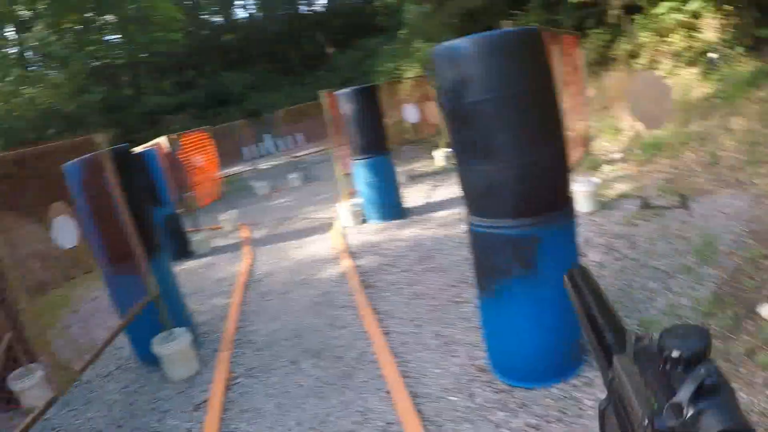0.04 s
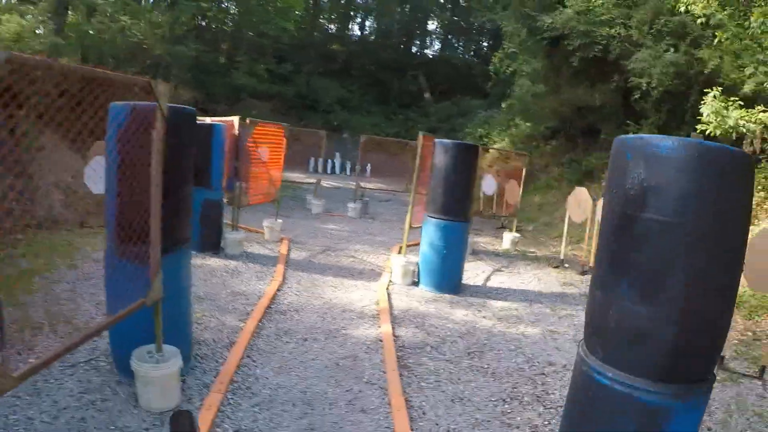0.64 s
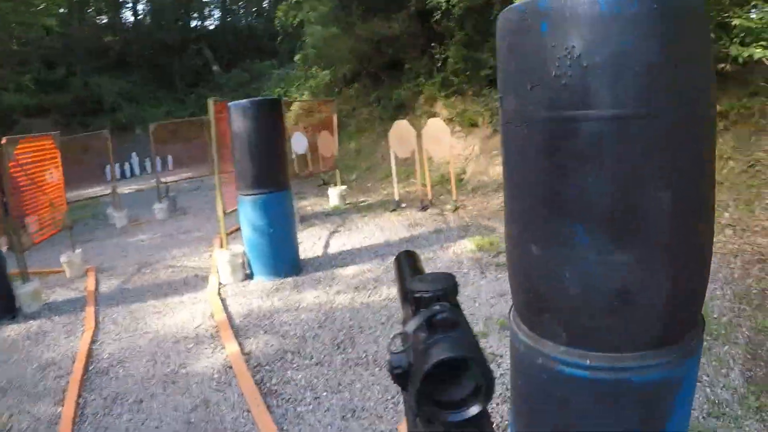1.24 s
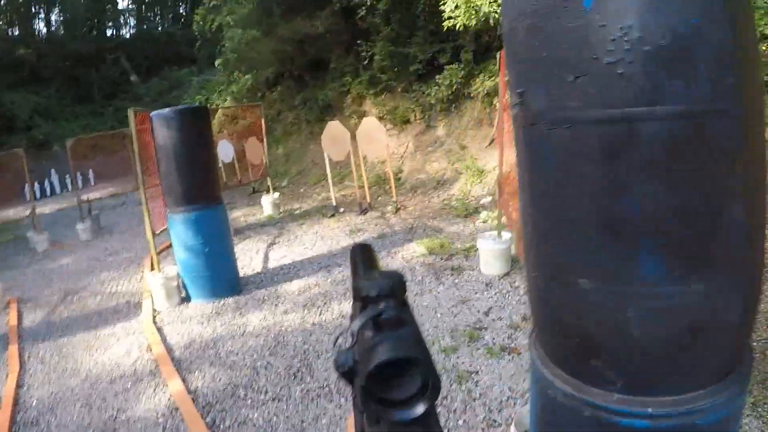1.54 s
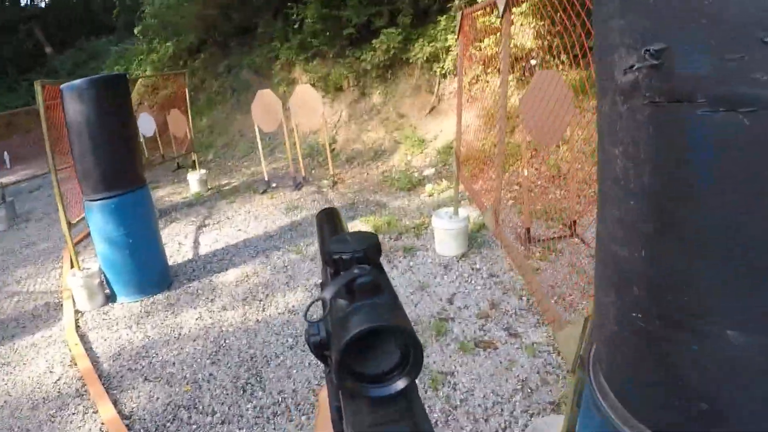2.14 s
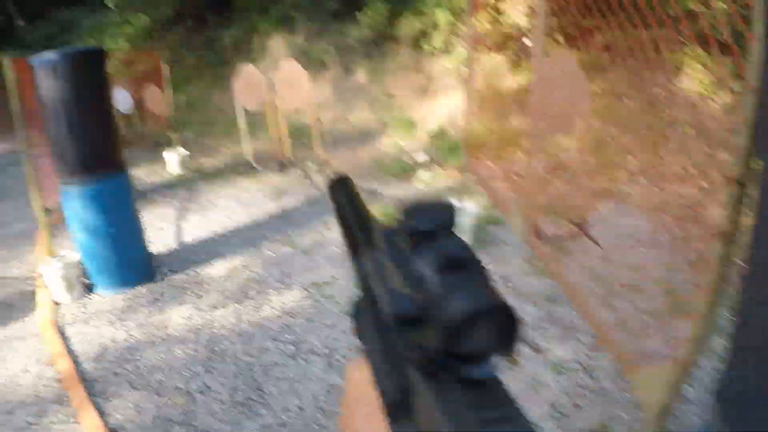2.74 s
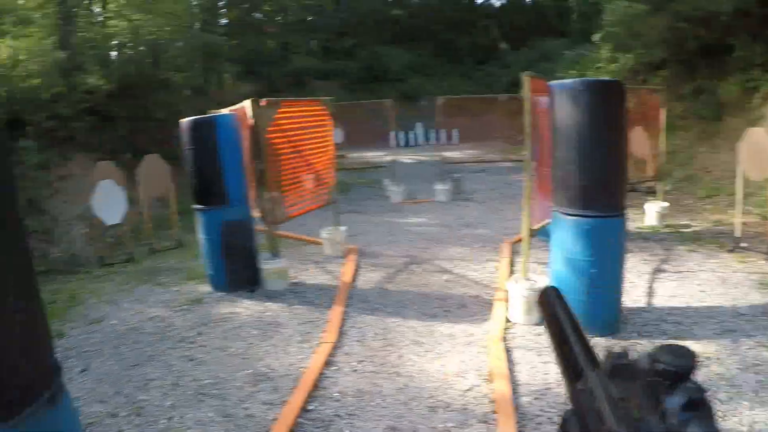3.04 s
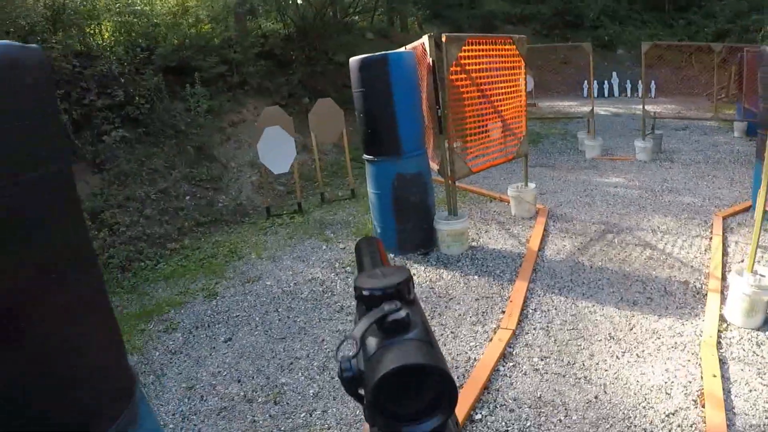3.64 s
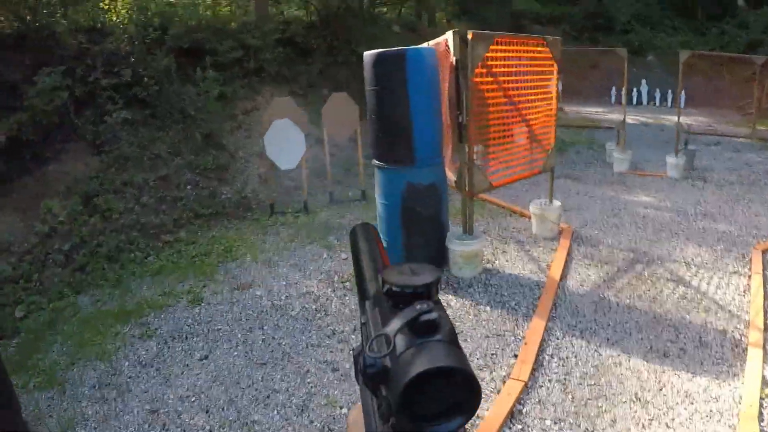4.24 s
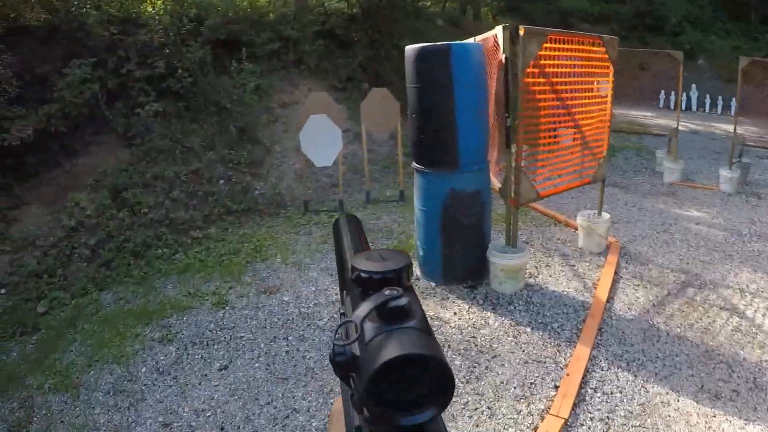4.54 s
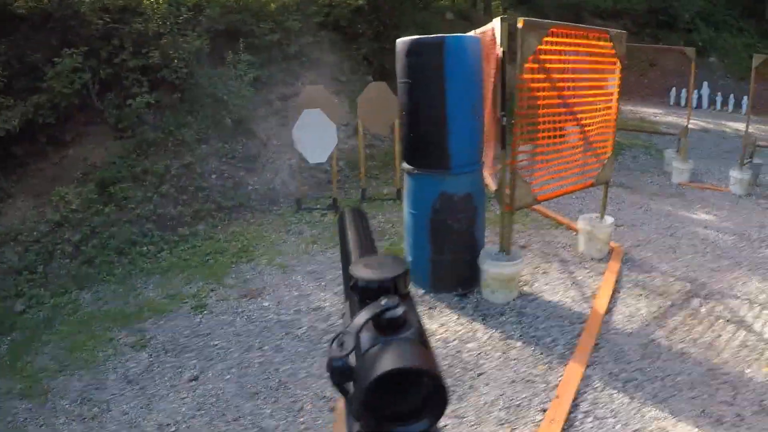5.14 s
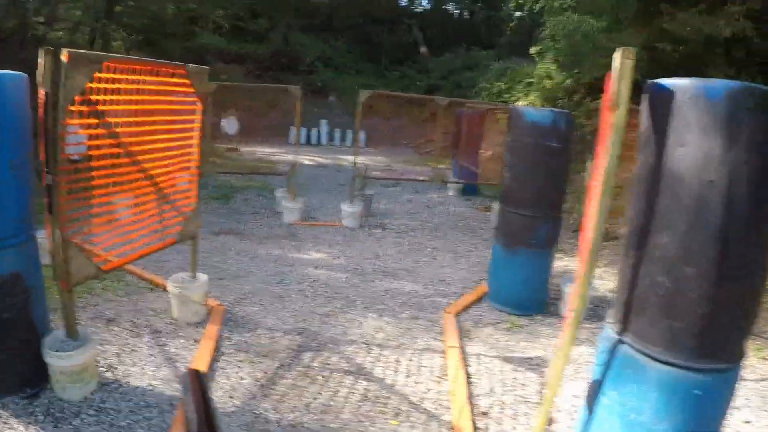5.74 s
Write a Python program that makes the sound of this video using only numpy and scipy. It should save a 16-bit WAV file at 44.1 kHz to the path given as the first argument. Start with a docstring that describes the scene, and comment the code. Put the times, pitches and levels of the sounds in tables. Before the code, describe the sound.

At an outdoor gravel range, heard from the shooter's head, a few brass cases tinkle and hurried footsteps crunch through gusts of wind. Four close bursts of three or four rounds snap from a suppressed submachine gun, with a clattering metal bolt and a short woodland echo. Far guns knock faintly, and light steps and wind fill the pauses before more cases ring on the stones.

```python
"""A gravel shooting bay, heard from the shooter's head: a suppressed submachine gun fires four short bursts.
Each shot layers a muzzle puff, a sharp pop of gas at the ejection port and the steel slap of the bolt;
berms and trees answer. Between bursts boots run over gravel, wind buffets the microphone, spent cases
tinkle and far guns knock. The image moves between stereo and a hollower mono."""
import sys
import numpy as np
from scipy import signal
from scipy.fft import rfft, irfft, next_fast_len
from scipy.io import wavfile
from scipy.ndimage import uniform_filter1d

SR = 44100
rng = np.random.default_rng(int(sys.argv[2]) if len(sys.argv) > 2 else 0)


def digitize_waveform(pressure):
    """Quantize a signal to 16-bit integers and store it at the path in sys.argv[1].

    Rows of a 2-D input are taken as channels; values are limited to [-1, 1].
    """
    field = np.atleast_2d(pressure).T
    bounded = np.clip(field, -1, 1)
    quanta = np.round(bounded * 32767).astype(np.int16)
    wavfile.write(sys.argv[1], SR, quanta)


N = 255325
HIT = np.arange(SR // 4) / SR  # time axis of a one-shot, in s

# noise colours of the air bed: f/Hz, level/dB
WOODS = [(30, 12.5), (200, 0), (600, -6.5), (1000, -9), (1800, -5), (2700, -15.5), (3900, -11.5),
         (5500, -29), (9000, -19.5), (15000, -31.5)]
WIND_BUFFET = [(10, 1), (30, 6), (48, -5), (100, -14), (200, -33), (600, -50.5), (2000, -78)]
WIND_RUSH = [(60, -11), (150, 2.5), (400, -7.5), (1000, -14), (3000, -22), (6000, -31.5), (9500, -26.5),
             (13000, -33.5), (16000, -45.5)]
# the shooter's moves stir the air: start/s, end/s, buffet level/dB, rush level/dB
MOVES = [(0.5, 0.9, -41.5, -62.5), (1.058, 1.75, -36, -54), (1.95, 2.253, -48.5, -62.5),
         (3.356, 3.68, -40.5, -78), (4.453, 4.62, -46, -68.5), (5.45, 5.79, -43, -62)]
# colour and decay of the echo off berms and trees: f/Hz, level/dB, t60/s
ECHO = [(71.04, 2, 0.25), (200, 0, 0.79), (570, -7.5, 1.3), (1000, -13, 1), (1470, -3, 0.72),
        (1790, -0.5, 1.4), (2100, -2.5, 1.05), (2970, -4.5, 1), (3740, 1.5, 1.19), (4700, -3.5, 0.86),
        (6700, -2, 0.78), (8685, -5, 0.68), (10100, -6.5, 0.47), (15500, -19, .48)]
# dull knocks, from guns in other bays or stones underfoot: t/s, level/dB, t60/s, f/Hz
KNOCKS = [(1.028, -54, 0.026, 1500), (1.527, -37.5, 0.027, 1300), (1.568, -27.5, 0.018, 1300),
          (1.607, -34.5, 0.025, 1100), (2.2458, -26.5, 0.05, 943), (2.9961, -38.5, 0.13, 1050),
          (5.472, -45, 0.0097, 1100)]
# colour of a knock: multiple of its pitch, level/dB
KNOCK_COLOUR = [(.17, -26.5), (.55, -7.5), (1, 4), (1.5, -13), (2.4, -21), (5, -31.5), (11, -38.5)]
# footfalls: t/s, thud level/dB, thud f/Hz, gravel level/dB
STEPS = [(.51, -34.5, 39.8, -65), (0.578, -25, 59.4, -59.5), (0.941, -50.5, 35, -58.5),
         (1.01, -40, 50, -52), (1.106, -20, 92.5, -52.5), (1.525, -26, 36, -46), (1.605, -27, 51.3, -50.5),
         (3.387, -36, 54.9, -88), (3.59, -33.5, 36, -57.5), (3.63, -27.5, 40, -68.5),
         (5.42, -50, 30.6, -60), (5.58, -47.5, 36.2, -59)]
# boots scraping loose stones: t/s, level/dB, t60/s
SCUFFS = [(0.629, -63.5, 0.27), (1.03, -61, 0.14), (1.125, -55, 0.22), (1.44, -56, 0.04),
          (1.496, -49, 0.085), (1.62, -54, 0.06)]
# noise colours of a sole landing, gravel crunching and grit scraping: f/Hz, level/dB
SOLE = [(50, -6), (110, 7), (220, -5.5), (450, -16), (900, -36.5), (3000, -60)]
CRUNCH = [(150, 1), (400, 2), (800, 3.5), (1300, 4), (2500, -10), (5000, -22), (12000, -40.5)]
GRIT = [(1200, -3), (2600, 2), (3700, -1.5), (5200, -9), (6600, -9), (10000, -13), (15000, -18)]
# spent cases landing: t/s, level/dB
CASES = [(0.2685, -53.5), (.3522, -55), (0.395, -51.5), (0.4834, -49), (.7618, -58.5), (1.6615, -48),
         (3.3407, -59.5), (5.3283, -48.5), (5.438, -47.5), (5.5183, -52), (5.6225, -55), (5.7762, -55)]
# ring of a brass case: multiple of its pitch, t60/s, level/dB
CASE_MODES = [(0.999, .2, -10.5), (1.02, 0.15, -19.5), (1.53, .2, -22.5), (1.69, .15, -22)]
# noise colours of the gun's layers: f/Hz, level/dB
TRIGGER_CLICK = [(500, -31), (1400, -19), (2200, 6), (4000, 2), (5500, -4), (7500, -4), (10000, -23),
                 (15500, -32)]
RASP_HIGH = [(1200, -24), (2800, -17), (3900, 4), (5200, -11), (7000, -9), (8400, -5), (11000, -18),
             (15500, -26.5)]
RASP_LOW = [(200, 0), (600, -15), (770, 3), (1050, -7.5), (1400, -5.5), (2200, -2), (3200, -17),
            (6000, -27)]
MUZZLE_GAS = [(300, -7), (700, 5.5), (1000, 2.5), (1350, -11), (2400, -26), (3900, 6.5), (5500, -6.5),
              (8500, -6), (11000, -15), (15500, -19)]
BREECH_GAS = [(1500, -11.5), (2700, -20), (3500, 0.5), (4400, 1), (5500, -5), (8400, -3), (11000, -7.5),
              (13000, -1), (15500, -8)]
BOLT_SLAP = [(300, -0.5), (600, -3.5), (760, 8), (1000, -13), (1500, -4.5), (1900, 9.5), (2600, -5.5),
             (3700, 2), (5000, -5.5), (8000, -16), (11000, -25.5), (15500, -25)]
SCATTER = [(150, 8), (450, 0.5), (1000, -4.5), (1900, -2), (2800, -5), (3800, 3), (5200, -10.5), (7500, -7),
           (11000, -11.5), (15500, -21.5)]
# ring of the steel bolt and receiver: f/Hz, t60/s, level/dB
STEEL_MODES = [(755, 0.1, -2.5), (1385, .08, -12), (1815, 0.15, -3), (1903, 0.042, 2.5),
               (2230, 0.029, -7.5), (3390, .05, -1.5), (3770, .06, -0.5), (3900, 0.024, -5.5),
               (7600, 0.055, -10), (8200, 0.037, -11.5)]
# resonances of port and receiver: f/Hz, width/Hz, level/dB
PORT_MODES = [(2030, 260, -18), (3670, 420, 5.5), (5900, 290, -18.5), (7300, 1400, -3), (9500, 780, -18),
              (11900, 720, -14.5), (14500, 1700, -23)]
# air set ringing by a shot, its body and its low end: delay/s, f/Hz, t60/s, level/dB
PUFF_MODES = [(-.0032, 533, 0.0055, -8.5), (-.0011, 276, 0.045, -13), (-.0028, 450, 0.028, -21),
              (.001, 88, 0.15, -24)]
BOOM_MODES = [(0.0021, 155, 0.08, -19), (0.00018, 75, 0.054, -17.5)]
# gas spitting from the opening breech, then blows of bolt and spring: delay/s, t60/s, level/dB
BREECH_SPITS = [(.0008, .012, -19.5), (.0027, 0.01, -20.5)]
BOLT_BLOWS = [(.009, .025, -34), (.015, 0.036, -29), (.029, .02, -34)]
# bursts of fire: t/s, rounds, cycle/s, then level/dB of port pop, muzzle puff, muzzle gas, boom,
# bolt, trigger, end of the rasp, and the rasp's lows against its highs
BURSTS = [(1.7675, 3, 0.0746, 1.5, 4, -18.5, 7, 0.5, -19, -12.5, 1),
          (2.4397, 4, 0.076, -5, 0.5, -5.5, 1.5, -1, -32.5, -33.5, 1.5),
          (3.9718, 3, 0.0746, 0, 6, -9.5, -6, 5, -26, -10.5, -2.5),
          (4.7080, 3, 0.076, 0, 3, -7, -6, 3, -34, -25, -1)]
# spans in which the image opens to stereo: start/s, end/s
STEREO_SPANS = [(-1, 0.09), (1.36, 3)]
# dips in the microphone's tone: f/Hz, width/Hz, stereo level/dB, mono level/dB
MIC_DIPS = [(1010, 800, -3, -2), (2770, 1200, -1, -5.5), (5400, 530, 0, -3.5), (11400, 1000, -3, -5)]


def undb(db):
    """Decibels to gain."""
    return 10 ** (np.asarray(db) / 20)


def fade(t, t60):
    """Exponential decay, 60 dB down after t60."""
    return np.exp(-np.log(1000) * t / t60)


def attack(t, rise_s):
    """A soft onset from 0 towards 1."""
    return 1 - np.exp(-t / rise_s)


def pan(db):
    """Stereo gains, the left louder by db."""
    return undb(np.array([[db], [-db]]) / 2)


def add(out, s, sound):
    """Mix a sound in at time s; what lies outside is dropped."""
    i = int(round(s * SR))
    a, b = max(i, 0), min(i + sound.shape[-1], N)
    if b > a:
        out[:, a:b] += sound[..., a - i:b - i]


def noise(spectrum, size, side):
    """Coloured stereo noise, rms 1 in the middle; side sets its width."""
    hz, db = np.transpose(spectrum)[:2]
    n = next_fast_len(size)
    f = np.maximum(np.fft.rfftfreq(n, 1 / SR), 1)
    gain = undb(np.interp(np.log(f), np.log(hz), db)) * np.minimum(f / hz[0], 1)
    mid, wide = irfft(rfft(rng.standard_normal((2, n))) * gain, n)[:, :size]
    return np.array([mid + side * wide, mid - side * wide]) / mid.std()


def noise_hit(spectrum, t60, side=0.47):
    """A hit of coloured noise that dies away."""
    return noise(spectrum, len(HIT), side) * fade(HIT, t60)


def ring(hz, t60):
    """One damped mode, swinging negative first."""
    return -np.sin(2 * np.pi * hz * HIT) * fade(HIT, t60)


def drift(rate_hz):
    """Smooth random modulation with a spread near 1."""
    hold = int(SR / rate_hz)
    return uniform_filter1d(np.repeat(rng.standard_normal(N // hold + 1), hold), hold)[:N]


def shots():
    """Cue list of rounds: the first of a burst cracks and clatters harder, then the muzzle layers ease off."""
    for start, rounds, cycle_s, pop_db, puff_db, gas_db, boom_db, bolt_db, *_ in BURSTS:
        for k in range(round(rounds)):
            first = k == 0
            yield (start + k * cycle_s, k, pop_db + 3 * first, puff_db - 2.5 * k,
                   gas_db - 2.5 * k, boom_db - 2 * k, bolt_db + 2.5 * first)


def air(woods_db=-64, still_buffet_db=-59, still_rush_db=-76, rise_db_per_s=57, fall_db_per_s=59):
    """The bed: woods murmur while wind buffets the microphone and rushes past, swelling with each move."""
    t = np.arange(N) / SR
    buffet_db, rush_db = still_buffet_db, still_rush_db
    for start, end, move_buffet_db, move_rush_db in MOVES:
        drop_db = rise_db_per_s * np.maximum(start - t, 0) + fall_db_per_s * np.maximum(t - end, 0)
        buffet_db = np.maximum(buffet_db, move_buffet_db - drop_db)
        rush_db = np.maximum(rush_db, move_rush_db - drop_db)
    gust = drift(9.9)
    buffet = undb(buffet_db + 2 * gust) * noise(WIND_BUFFET, N, side=.8)
    rush = undb(rush_db + 1.5 * gust) * noise(WIND_RUSH, N, side=.7)
    woods = undb(woods_db + drift(3)) * noise(WOODS, N, side=.8)
    return woods + buffet + rush


def echo(length_s=1.5, build_s=0.046, patchy_db=1.0):
    """One shot's tail off berms and trees: it blooms, comes in patches and darkens."""
    hz, _, t60 = np.transpose(ECHO)
    f, t, bands = signal.stft(noise(ECHO, int(length_s * SR), side=.85), SR, nperseg=256)
    decay = fade(t, np.interp(f, hz, t60)[:, None])
    patches = undb(patchy_db * rng.standard_normal(len(t)))
    return signal.istft(bands * decay * patches * attack(t, build_s), SR)[1]


def bay_echoes(send_db=-34, earlier_db=-37, earlier_s=0.12):
    """The bay answers every pop; a tail of earlier fire is still dying at the start."""
    out = np.zeros((2, N))
    add(out, -earlier_s, undb(earlier_db) * pan(1.7) * echo())
    for s, _, pop_db, *_ in shots():
        add(out, s, undb(send_db + pop_db) * pan(3) * echo())
    return out


def knocks(onset_s=.0007):
    """Far guns or stones underfoot: dull, soft-edged knocks with a faint, wider tail."""
    out = np.zeros((2, N))
    for s, db, t60, hz in KNOCKS:
        colour = [(multiple * hz, gain_db) for multiple, gain_db in KNOCK_COLOUR]
        knock = noise_hit(colour, t60, side=0.48) + undb(-14) * noise_hit(colour, t60=0.11, side=.8)
        add(out, s, undb(db) * pan(-1) * knock * attack(HIT, onset_s))
    return out


def footsteps(grain_db=5, grain_samples=90, press_s=0.0027):
    """Each footfall thuds through the body and grinds the gravel as the weight comes on."""
    out = np.zeros((2, N))
    pressure = attack(HIT, press_s) ** 2
    for s, thud_db, hz, gravel_db in STEPS:
        grains = np.repeat(undb(grain_db * rng.standard_normal(len(HIT))), grain_samples)[:len(HIT)]
        crunch = noise_hit(CRUNCH, t60=0.17) * uniform_filter1d(grains, size=30)
        thud = ring(hz, t60=0.11) + undb(-9.5) * noise_hit(SOLE, t60=0.14)
        add(out, s - press_s, undb(3) * pressure * (undb(thud_db) * thud + undb(gravel_db) * crunch))
    return out


def scuffs(grain_db=4, onset_s=0.0027):
    """Loose stones scrape under the boots in short, bright, grainy strokes."""
    out = np.zeros((2, N))
    for s, db, t60 in SCUFFS:
        grains = undb(grain_db * drift(400)[:len(HIT)])
        add(out, s, undb(db) * noise_hit(GRIT, t60) * grains * attack(HIT, onset_s))
    return out


def spent_cases(pitch_hz=7030, detune=0.012, spread_db=4, ring_db=-2):
    """Brass ticks on the stones and rings on, each case with its own pitch and balance."""
    out = np.zeros((2, N))
    for s, db in CASES:
        hz = pitch_hz * (1 + detune * rng.standard_normal())
        tick = noise_hit([(2500, 0), (4000, 7), (9000, -2), (15000, -2.5)], t60=0.026)
        tone = sum(undb(mode_db + spread_db * rng.standard_normal()) * ring(hz * multiple, t60)
                   for multiple, t60, mode_db in CASE_MODES)
        add(out, s, undb(db) * (tick + undb(ring_db) * tone))
    return out


def trigger_and_rasp(trigger_lead_s=0.059, rasp_lead_s=0.031):
    """The lead-in to a burst: the trigger clicks, the action rings on, a rasp runs into the first shot."""
    out = np.zeros((2, N))
    n = int(rasp_lead_s * SR)
    for s, *_, trigger_db, rasp_db, low_db in BURSTS:
        click = noise_hit(TRIGGER_CLICK, t60=.02) + undb(-19.5) * noise_hit(SCATTER, t60=0.45)
        add(out, s - trigger_lead_s, undb(trigger_db + 3.5) * click * attack(HIT, rise_s=0.00095))
        rasp = noise(RASP_HIGH, n, side=.3) + undb(low_db) * noise(RASP_LOW, n, side=.4)
        swell = undb(np.linspace(trigger_db - 3.5, rasp_db, n)) * attack(HIT[:n], rise_s=0.0025)
        add(out, s - rasp_lead_s, rasp * swell)
    return out


def steel_ring(spread_db=3, detune=0.0047):
    """The struck receiver rings, its modes balanced and tuned a little differently on every blow."""
    chance = rng.standard_normal((len(STEEL_MODES), 2))
    return sum(undb(db + spread_db * louder) * ring(hz * (1 + detune * sharper), t60)
               for (hz, t60, db), (louder, sharper) in zip(STEEL_MODES, chance))


def bolt_shove(hz=33, half_width_s=0.018):
    """The heavy bolt runs forward and shoves the gun: one sub-bass swell, centred in its window."""
    t = HIT - HIT.mean()
    return np.cos(2 * np.pi * hz * t) * np.exp(-(t / half_width_s) ** 2)


def port_pop(jet_t60=0.0065, side=0.35, drive_db=12, hollow_hz=2600, hollow_width_hz=900):
    """A very short jet of gas rings port and receiver, scooped below the main resonance."""
    mid, wide = rng.standard_normal((2, len(HIT))) * fade(HIT, jet_t60)
    jet = np.array([mid + side * wide, mid - side * wide])
    pop = 0
    for hz, width, db in PORT_MODES:
        mode = signal.lfilter(*signal.iirpeak(hz, hz / width, fs=SR), jet)
        pop = pop + undb(db) * mode / np.linalg.norm(mode.mean(axis=0))
    scoop = signal.iirnotch(hollow_hz, hollow_hz / hollow_width_hz, fs=SR)
    return undb(drive_db) * signal.lfilter(*scoop, pop) / 2


def gun(muzzle_lead_s=.0033, port_lead_s=0.00045, shove_lead_s=0.016, steel_db=-6, shove_db=-21):
    """The shots, left of centre: muzzle gas gives the body, port gas the crack, the bolt the clatter."""
    out = np.zeros((2, N))
    low_pan, high_pan = pan(6.5), pan(3)
    for s, round_index, pop_db, puff_db, gas_db, boom_db, bolt_db in shots():
        if round_index > 0:
            weight = undb(shove_db) * (undb(boom_db) + undb(puff_db)) / 2
            add(out, s - shove_lead_s - HIT.mean(), weight * bolt_shove())
        for modes, level_db in ((PUFF_MODES, puff_db), (BOOM_MODES, boom_db)):
            for delay, hz, t60, db in modes:
                detune = np.exp(.04 * rng.standard_normal())
                add(out, s + delay, low_pan * undb(level_db + db) * ring(hz * detune, t60))
        add(out, s - muzzle_lead_s, low_pan * undb(gas_db) * noise_hit(MUZZLE_GAS, t60=0.012))
        add(out, s - port_lead_s, high_pan * undb(pop_db) * port_pop())
        for delay, t60, db in BREECH_SPITS:
            add(out, s + delay, high_pan * undb(pop_db + db) * noise_hit(BREECH_GAS, t60))
        # early scatter off gravel and barrels
        add(out, s + .003, high_pan * undb(bolt_db - 29.5) * noise_hit(SCATTER, t60=.25, side=.7))
        for delay, t60, db in BOLT_BLOWS:
            blow = noise_hit(BOLT_SLAP, t60) + undb(steel_db) * steel_ring()
            jitter_s = .001 * rng.standard_normal()
            add(out, s + delay + jitter_s, high_pan * undb(bolt_db + db) * blow)
    return out


def scene():
    """The mix at the shooter's head: gun up front, then the bay, the foley and the air bed."""
    gunfire = gun() + trigger_and_rasp() + bay_echoes()
    return gunfire + knocks() + footsteps() + scuffs() + spent_cases() + air()


def stereo_width(open_s=0.291, close_s=0.47, mono_side_db=-49):
    """Side gain: it opens quickly for each stereo span and closes more slowly after it."""
    t = np.arange(N) / SR
    opened = [np.minimum((t - start) / open_s, 1 - (t - end) / close_s) for start, end in STEREO_SPANS]
    return np.clip(np.max(opened, axis=0), undb(mono_side_db), 1)


def record(dry, ceiling=0.84, top_hz=15600):
    """The image opens and closes to a hollower mono; peaks are soft-clipped and the top is cut."""
    width = stereo_width()
    mid, side = (dry[0] + dry[1]) / 2, width * (dry[0] - dry[1]) / 2
    for hz, width_hz, stereo_db, mono_db in MIC_DIPS:
        depth = 1 - undb(mono_db + width * (stereo_db - mono_db))
        mid = mid - depth * signal.lfilter(*signal.iirpeak(hz, hz / width_hz, fs=SR), mid)
    sound = np.array([mid + side, mid - side])
    rounded = sound / (1 + (sound / ceiling) ** 4) ** (1 / 4)
    return signal.sosfilt(signal.ellip(10, .2, 80, top_hz, fs=SR, output="sos"), rounded)


dry = scene()
out = record(dry)
digitize_waveform(out)
```